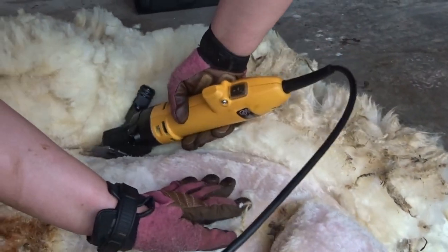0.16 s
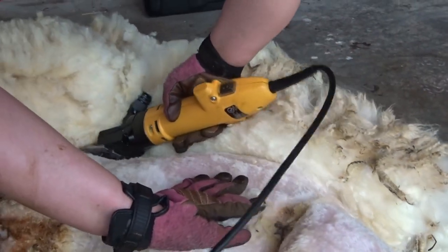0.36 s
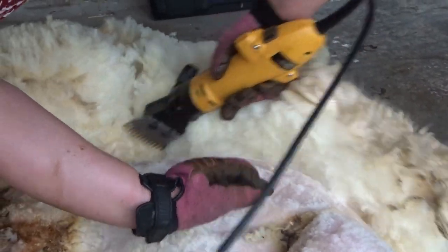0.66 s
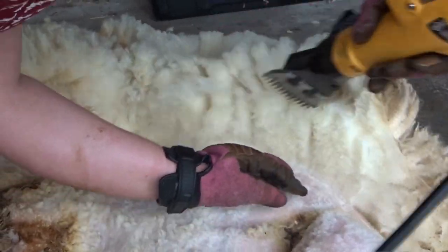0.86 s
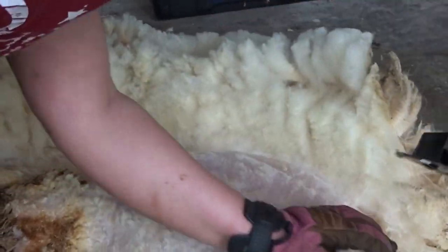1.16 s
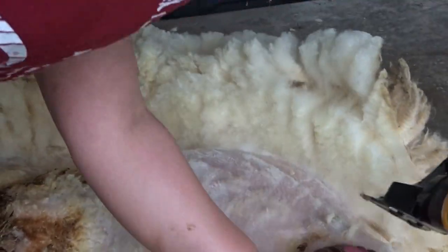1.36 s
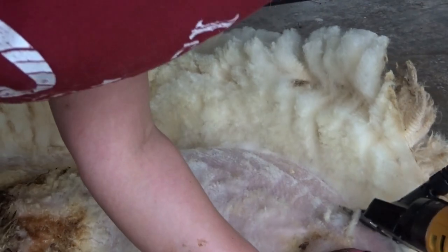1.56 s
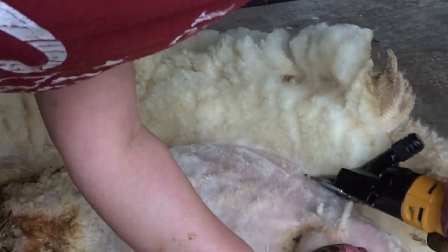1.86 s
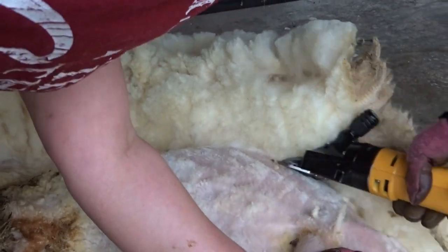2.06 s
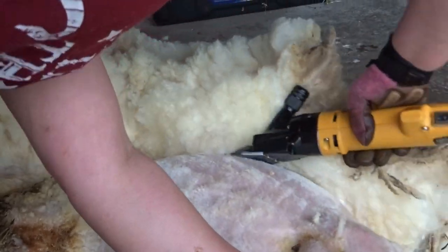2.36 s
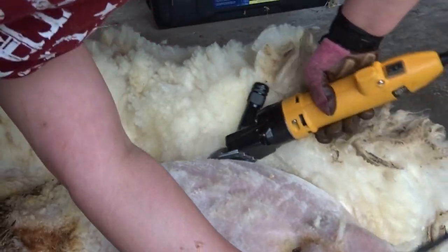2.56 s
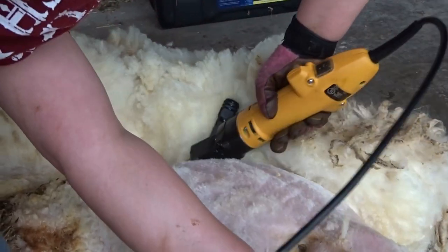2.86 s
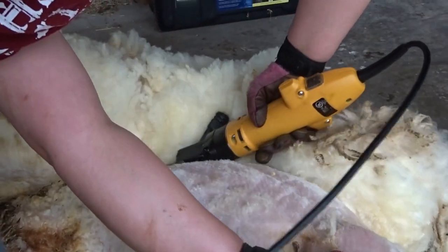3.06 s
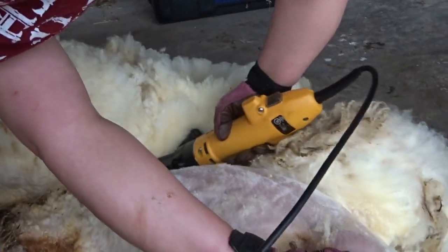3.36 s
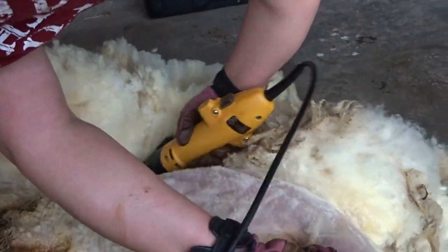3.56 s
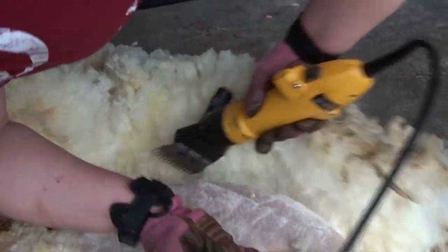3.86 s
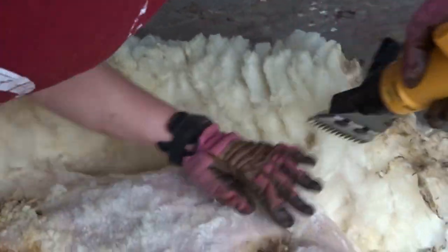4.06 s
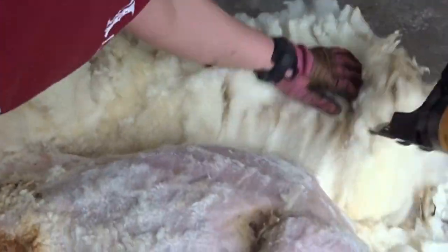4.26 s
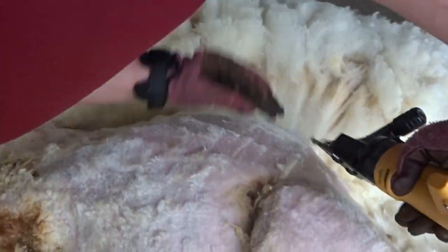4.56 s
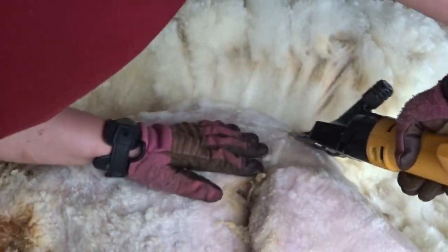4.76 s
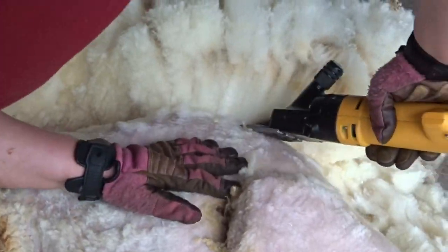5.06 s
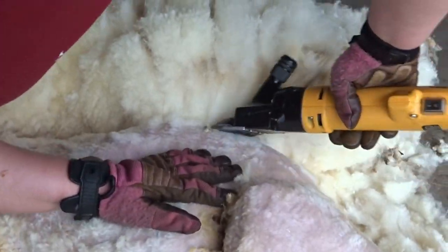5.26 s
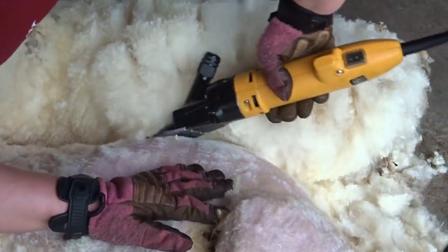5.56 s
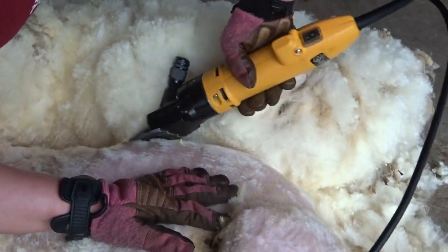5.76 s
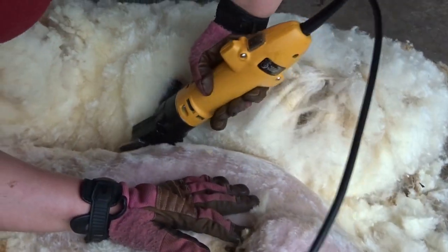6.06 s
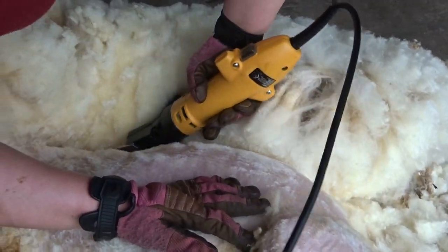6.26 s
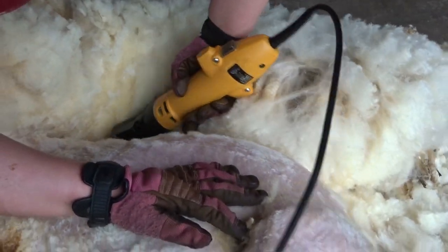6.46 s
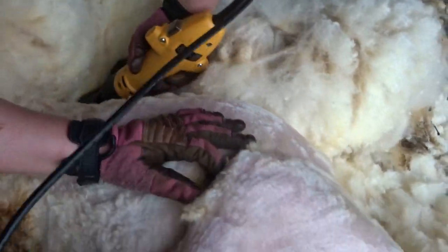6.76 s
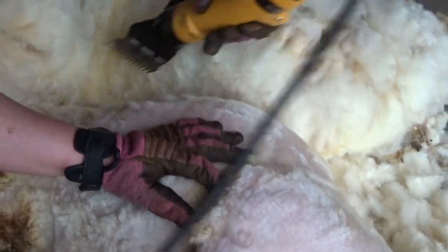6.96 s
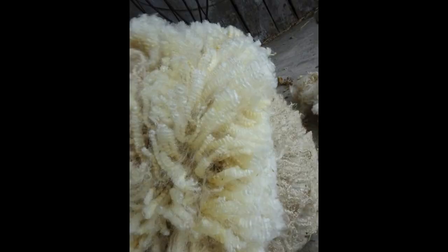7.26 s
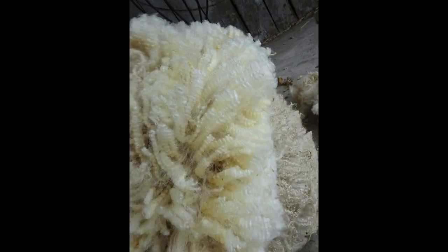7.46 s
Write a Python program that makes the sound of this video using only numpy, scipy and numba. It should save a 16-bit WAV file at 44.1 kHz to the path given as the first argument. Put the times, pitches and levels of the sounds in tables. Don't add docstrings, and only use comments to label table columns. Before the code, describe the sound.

Loud handheld shearing clippers run without pause, whining and rasping through wool in repeated passes, then cut quickly to silence.

```python
import sys
import numpy as np
from scipy import signal
from scipy.fft import rfft, irfft
from scipy.io import wavfile
from scipy.ndimage import uniform_filter1d, map_coordinates
from numba import njit

SR = 44100
rng = np.random.default_rng(int(sys.argv[2]) if len(sys.argv) > 2 else 0)


def file_out(sig):
    cols = np.atleast_2d(sig).T
    lim = np.clip(cols, -1, 1)
    pcm = np.round(lim * 32767).astype(np.int16)
    wavfile.write(sys.argv[1], SR, pcm)


def volts_from_db(level):
    exponent = np.asarray(level, float) / 20
    return 10 ** exponent


N = 336483
T = np.arange(N) / SR
HZ = np.arange(N // 2 + 1) * SR / N + 1e-3
CRANK = 0.128
FREE_HZ, LOADED_HZ = 396, 371


def level(x, db=0):
    return x * volts_from_db(db) / np.sqrt(np.mean(x ** 2))


def curves(table, clock=T):
    s, *columns = np.transpose(table)
    return [np.interp(clock, s, column) for column in columns]


def over_hz(table):
    hz, value = np.transpose(table)
    return np.interp(np.log(HZ), np.log(np.maximum(hz, 200 * (hz == 0))), value)


def bands(centres_hz, gains):
    return np.interp(np.log(HZ), np.log(centres_hz), gains)


def walk(rate):
    hold = int(SR / rate)
    steps = np.repeat(rng.standard_normal(N // hold + 1), hold)
    return 1.3 * uniform_filter1d(uniform_filter1d(steps, hold), hold)[:N]


def bumps(rows):
    return sum(np.outer(db, np.exp(-(2 * (T - s) / length) ** 2)) for s, length, *db in rows)


def loaded(parts, hz, rate):
    load = (FREE_HZ - hz) / (FREE_HZ - LOADED_HZ)
    return [clear_db + load_db * load + wander_db * walk(rate) for clear_db, load_db, wander_db in parts]


def sine(turns, rotor, stroke, db, flicker_db, wobble):
    cycles = (rotor + 2 * CRANK * stroke) * turns + rng.random()
    phase = 2 * np.pi * cycles + wobble * walk(40)
    return np.sqrt(2) * volts_from_db(db + flicker_db * walk(25)) * np.sin(phase)


def lines(turns, orders, dbs, flicker_db, wobble, drift_db):
    out = 0
    for order, db in zip(orders, dbs):
        come_and_go_db = drift_db * (order != (1, 0)) * walk(2.9)
        out = out + sine(turns, *order, db + come_and_go_db, flicker_db, wobble)
    return out


# time in seconds, rotor speed in Hz.
ROTOR_SPEED = [(0.0, 379.4), (0.48, 377.2), (0.75, 386), (1.05, 391.7), (1.78, 395.2), (2.1, 385.3),
               (2.62, 381.9), (3.25, 371.5), (3.45, 371.3), (3.62, 369.1), (4.1, 388.6), (4.55, 395),
               (5.05, 396.6), (5.6, 381.9), (6.25, 373.5), (6.74, 370), (6.95, 381.9), (7.17, 388.2)]


def rotor_speed():
    return curves(ROTOR_SPEED)[0]


MESH_ORDERS = [(7, 0), (7, 1), (9, 1), (6, 0), (10, 0), (15, 0), (17, 0), (32, 0)]
MESH_DB = [-21, -24, -23, -25, -25, -30, -30, -36]


def mesh(turns, whine_db, lower_db, upper_db, ninth_db, second_db, third_db):
    teeth = 2 * np.pi * 8 * turns + 0.2 * walk(40)
    stroke = 2 * np.pi * 2 * CRANK * turns
    out = volts_from_db(whine_db + 1.43 * walk(25) + 1.0 * walk(120)) * np.sin(teeth)
    for strokes, db in ((-1, lower_db), (0.99, upper_db)):
        side_level = volts_from_db(np.minimum(db, -48.5) + 2.5 * walk(40))
        out += side_level * np.sin(teeth + strokes * stroke + 0.5 * walk(50))
    out = np.sqrt(2) * out
    out += sine(turns, 9, 0, np.minimum(ninth_db - 1, -54), flicker_db=3.5, wobble=0.6)
    for rotor, db in ((16, second_db), (24, third_db)):
        out += sine(turns, rotor, 0, db, flicker_db=3.5, wobble=0.249)
    return out + volts_from_db(-42) * lines(turns, MESH_ORDERS, MESH_DB, flicker_db=3.1, wobble=0.5, drift_db=3.0)


# time in seconds, length in seconds, then whine, lower and upper stroke line in dB.
SHADES = [(.33, .3, -4, -6, -2), (.65, .2, 1.5, 1.5, 3), (.87, 0.17, -5.5, -4, 0), (1.02, .15, 0.5, 5, -1),
          (1.58, .35, -3, -2, 8.5), (2.33, .35, -2.5, 0, 4.5), (2.75, .45, -0.5, 8.5, 10.5),
          (3.38, 0.23, -1, 7.5, 4), (3.6, .14, -15.5, 3, -2), (3.92, .35, -3, 1.5, 2),
          (4.215, 0.046, -12, -1, 2), (4.5, .12, 4, -2.5, 0), (4.73, .25, -2.5, -1, -2),
          (5.03, .25, 0.5, 7, 0.5), (5.6, 0.46, -7.5, 6.5, 6), (6.1, .5, 0.5, 9, 5),
          (6.69, 0.27, -7.5, -0.5, 2.5), (7.0, 0.15, -6.5, 0.5, 1.5)]
# time in seconds, length in seconds, then ninth order, second and third whine harmonic in dB.
GLINTS = [(.12, .15, -10, 4.5, 1), (.55, .3, -3, 6.5, 1.5), (1.1, .3, 9.5, 6, -2),
          (1.55, .5, -1, -2.5, -2.5), (1.85, .3, -4.5, 2.5, -2), (2.4, .2, 5.5, 7, -2.5),
          (2.85, .3, 3.5, -7, 4.5), (3.3, .5, 2.5, 3, 0), (4.15, .3, 7.5, 7.5, 2.5),
          (4.5, .3, -0.5, -6.5, -2.5), (4.75, .25, 8, -3, 5), (5.1, .3, -3, -0.5, -1),
          (5.55, .4, 7, 5, 8.5), (6.1, .3, 6.5, 1, 1)]
# level running clear in dB, change at full load in dB, wander in dB.
WHINE, LOWER, UPPER = (-41, 0, 0.57), (-57, 0, 1.5), (-57.5, 2.6, 1.5)
NINTH, SECOND, THIRD = (-58, 1, 1.9), (-56.5, -5, 0.8), (-60.5, -8, 1.5)


def gear_whine(turns, hz):
    mesh_db = np.array(loaded((WHINE, LOWER, UPPER, NINTH, SECOND, THIRD), hz, 5.4))
    return mesh(turns, *(mesh_db + np.vstack([bumps(SHADES), bumps(GLINTS)])))


def scrape(turns, stroke_db=0.5, crank_db=0.26, third_db=1.1, rotor_db=1.0, grit_db=1.5):
    crank = 2 * np.pi * CRANK * turns
    swell_db = stroke_db * np.cos(2 * crank) + crank_db * np.cos(crank) + third_db * np.cos(6 * crank)
    swell_db += rotor_db * np.cos(2 * np.pi * turns)
    swell_db += grit_db * walk(900) + 0.42 * walk(14)
    return level(volts_from_db(swell_db) * rng.standard_normal(N))


def knocks(turns, back_db=-5, scatter_db=2.0):
    at = np.flatnonzero(np.diff(np.floor(2 * CRANK * turns)))
    way_back = np.arange(len(at)) % 2
    out = np.zeros(N)
    out[at] = volts_from_db(back_db * way_back + scatter_db * rng.standard_normal(len(at)))
    out += 0.83 * np.roll(out, 140)
    return level(signal.sosfilt(signal.butter(2, 1100, fs=SR, output="sos"), out))


def scatter(x, patchy_db=1.2):
    patch_rate = 3.5
    hz, s, cells = signal.stft(x, SR, nperseg=1024)
    patch = rng.standard_normal((48, int(s[-1] * patch_rate) + 2))
    rows, columns = np.meshgrid(np.log(hz + 900), s * patch_rate, indexing="ij")
    rows = (rows - rows.min()) / np.ptp(rows) * (len(patch) - 1)
    gain_db = patchy_db * map_coordinates(patch, [rows, columns])
    return signal.istft(cells * volts_from_db(gain_db), SR)[1][:N]


@njit
def ring(x, hz, width):
    width = max(width, 50.)
    y, b, l = np.empty(len(x)), 0., 0.
    for i in range(len(x)):
        g, k = np.tan(np.pi * hz[i] / SR), width / hz[i]
        v = (b + g * (x[i] - l)) / (1 + g * (g + k))
        b, l, y[i] = 2 * v - b, l + 2 * g * v, k * v
    return y


# time in seconds, length in seconds, then head, housing, and comb with fan in dB.
TIPS = [(.36, 0.37, 2.5, 0, 1.5), (.69, 0.17, -2, -5, -1.5), (.83, 0.13, -1, -0.5, 4),
        (1.2, .4, -2, 2.5, -0.5), (2.14, 0.49, 2, 1, 1), (2.43, 0.16, 2.5, 2, 0.5),
        (3.0, 0.66, 0, -1, -1.5), (3.6, 0.27, 4, 2.5, 0.5), (3.85, .15, 1.5, -2.5, 0.5),
        (4.1, 0.26, 0.5, 0, 1.5), (4.53, .08, -0.5, -2.5, -1.5), (5.15, 0.2, -1, 0, 0),
        (5.74, .2, 2.5, 2, 0.5), (5.93, 0.28, -1.5, 1, -1.5), (6.35, 0.36, -2.5, -0.5, -1),
        (6.8, .35, 1, 0, 2), (7.14, 0.14, -3.5, -1, -0.5)]
# level running clear in dB, change at full load in dB, wander in dB.
HEAD, HOUSING = (-60, 1, 0.86), (-50.5, -0.41, 0.71)
COMB, FAN = (-43.5, -0.51, 0.53), (-48.5, -1.7, 0.96)


def shading(hz):
    head_db, housing_db, high_db = bumps(TIPS)
    return np.array(loaded((HEAD, HOUSING, COMB, FAN), hz, 9)) + [head_db, housing_db, high_db, high_db]


# enters in seconds, lifts in seconds.
PASSES = [
    (-0.5, 0.42),
    (1.9, 3.59),
    (5, 6.75),
    (8.0, 9.7),
]
# frequency in Hz, level in dB.
BODY = [(30, -43), (170, -33.5), (260, -26.5), (330, -21), (480, -8), (700, -7.5), (1000, -4), (2000, -5.5),
        (2900, -1), (5000, -4), (6000, -5), (9500, -2.5), (14000, -4.5), (15700, -10)]
BAND_HZ = [750, 1700, 3100, 5300, 11000]
# stage, ring in Hz, strength in dB, head level in dB.
HEAD_GAP = [(0, 830.4, 0, 1), (.15, 803, -8.5, 1.5), (.55, 1068, -17, -2.5), (.95, 1050, 2.5, 0.5),
            (1.2, 709.7, 2, -0.5), (1.45, 683, -6.5, 1), (1.65, 850, 1, 0.5), (1.85, 867, 4.5, 0),
            (2, 830, 0.5, 0.5)]
# stage, ring in Hz, strength in dB, housing level in dB.
HOLLOW = [(0, 1340, -10, -1), (.3, 1420, 1, -1), (.6, 1750, -4, -1), (.9, 2230, 2.5, -0.5),
          (1.2, 2330, 4.5, -0.5), (1.45, 2550, -4.5, -1.5), (1.7, 1450, -15, -1), (1.9, 1375, -4.5, -1.5),
          (2, 1345, 0, -1.5)]
# stage, ring in Hz, strength in dB.
COMB_RING = [(0, 4730, 3), (.2, 4870, -2.5), (.5, 5100, -1.5), (1, 4870, -9), (1.4, 4600, -5.5),
             (1.75, 4440, -3.5), (2, 4750, 1.5)]


def clatter(source, turns, parts_db):
    head_db, housing_db, comb_db, fan_db = parts_db
    stage = np.interp(T, np.ravel(PASSES), np.arange(np.size(PASSES)) + 1) % 2
    spectrum = rfft(scatter(source)) * volts_from_db(over_hz(BODY))
    parts = [level(irfft(spectrum * bands(BAND_HZ, one), N)) for one in np.eye(len(BAND_HZ))]
    head, housing, gears, comb, fan = parts

    gap_hz, gap_db, cover_db = curves(HEAD_GAP, stage)
    head = level(head + volts_from_db(gap_db) * ring(head, gap_hz, 170.0))
    hollow_hz, hollow_db, muffle_db = curves(HOLLOW, stage)
    housing = level(housing + volts_from_db(hollow_db) * ring(housing, hollow_hz, 380.0))
    teeth_hz, teeth_db = curves(COMB_RING, stage)
    comb = level(comb + volts_from_db(teeth_db) * ring(comb, teeth_hz, 650.0))
    stroke_load_db = 1.0 * np.cos(2 * np.pi * 2 * CRANK * turns)
    gears_db = (housing_db + comb_db) / 2 + stroke_load_db

    out = head * volts_from_db(head_db + cover_db) + housing * volts_from_db(housing_db + muffle_db)
    return out + gears * volts_from_db(gears_db) + comb * volts_from_db(comb_db - 2.16) + fan * volts_from_db(fan_db - 0.2)


HUM_ORDERS = [(1, 0), (1, -1), (2, 0), (2, -1), (2, 1), (4, 0)]
HUM_DB = [1, -29, -16, -12.5, -23.5, -9]


def rotor_hum(turns, hum_db):
    family = lines(turns, HUM_ORDERS, HUM_DB, flicker_db=-0.5, wobble=0.05, drift_db=3.0)
    return volts_from_db(hum_db) * family


# frequency in Hz, phase in radians.
PORT_PHASE = [(30, .15), (220, .18), (380, 0.37), (950, 0.41), (2200, 0.43), (6980, 0.12), (10000, .2),
              (15400, 0.04)]


def two_ports(hum, tool, walls, pan_db):
    tilted = irfft(rfft(tool) * bands([400, 1500, 5000, 14000], [0, 1, 1, 0]), N)
    ports = []
    for sign in (1, -1):
        port = hum + tool + tilted * (volts_from_db(sign * pan_db / 2) - 1) + sign * walls
        ports.append(irfft(rfft(port) * np.exp(0.5j * sign * over_hz(PORT_PHASE)), N))
    return np.array(ports)


# time in seconds, hum in dB, left minus right in dB.
MOTOR = [(0.0, -58.5, -0.5), (0.08, -56.5, 0), (0.92, -59, -1.0), (0.98, -62, -1), (1.62, -62, -3.5),
         (1.92, -67, -1.5), (2.54, -56.5, -1.0), (3.3, -67, -0.5), (3.63, -60.5, -0.5), (3.65, -63.5, 0),
         (4.07, -56, -2), (4.53, -67, -2), (5.07, -75, -1.5), (5.43, -61.5, -1.5), (5.65, -59.5, -1.0),
         (6.21, -68, -0.5), (7.09, -60.5, 0.5), (7.17, -62.5, -1)]
# frequency in Hz, level in dB.
PORT_SIDE = [(60, -22.5), (300, -17.5), (1400, -28.5), (3000, -14.5), (7000, -19), (10000, -20.5),
             (15000, -23)]


def scene():
    hz = rotor_speed()
    turns = np.cumsum(hz) / SR
    hum_db, pan_db = curves(MOTOR)
    parts_db = shading(hz)
    cutter = scrape(turns) + volts_from_db(-14.5) * knocks(turns)
    tool = gear_whine(turns, hz) + clatter(cutter, turns, parts_db)
    reflected = clatter(scrape(turns + 2.6), turns, parts_db)
    walls = irfft(rfft(reflected) * volts_from_db(over_hz(PORT_SIDE)), N)
    return two_ports(rotor_hum(turns, hum_db), tool, walls, pan_db)


def barn():
    low = signal.butter(2, 260, fs=SR, output="sos")
    mid, side = signal.sosfilt(low, rng.standard_normal((2, N)))
    return level(mid + volts_from_db(-17.0) * side * np.array([[1], [-1]]), -87.0)


def top_cut(x):
    return signal.sosfilt(signal.butter(12, 15830, fs=SR, output="sos"), x)


def record(dry):
    rounded = np.tanh(dry / 0.068) * 0.069
    out = signal.sosfilt(signal.butter(3, 240, "high", fs=SR, output="sos"), rounded) + barn()
    fade_start_s, fade_end_s = 7.166, 7.194
    faded = np.clip((T - fade_start_s) / (fade_end_s - fade_start_s), 0, 1)
    return top_cut(out * np.cos(np.pi / 2 * faded) ** 2)


dry = scene()
out = record(dry)
file_out(out)
```